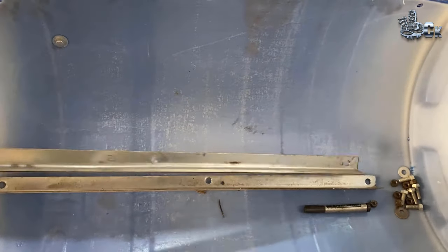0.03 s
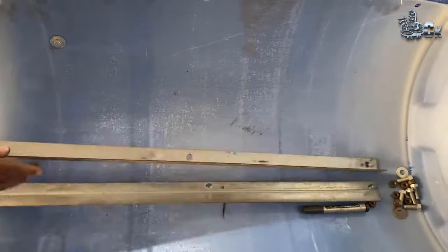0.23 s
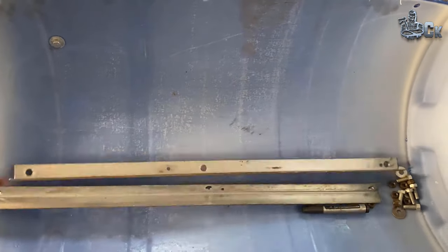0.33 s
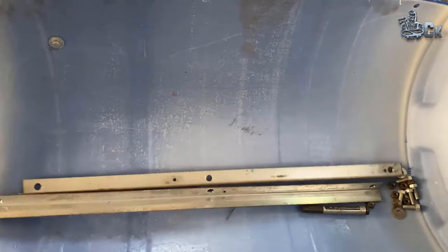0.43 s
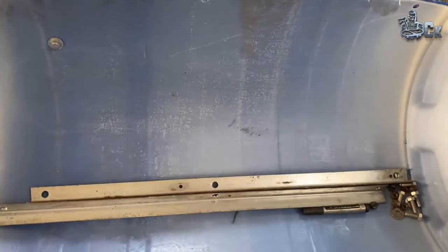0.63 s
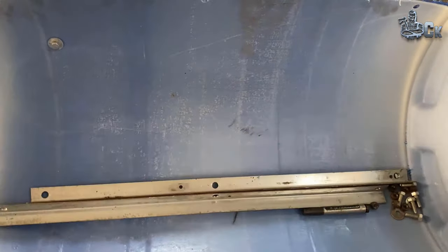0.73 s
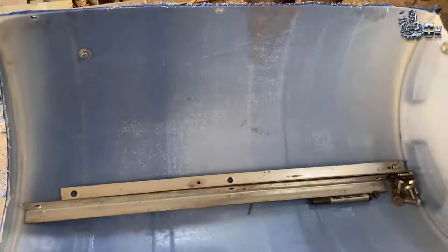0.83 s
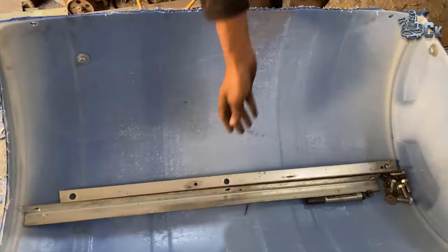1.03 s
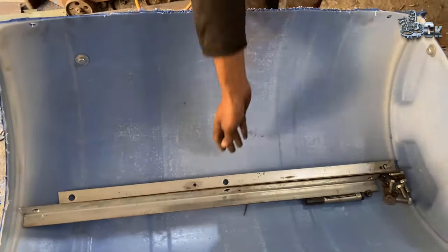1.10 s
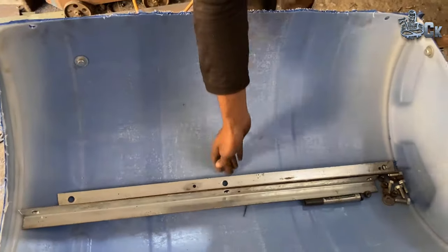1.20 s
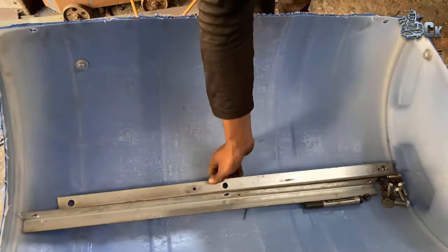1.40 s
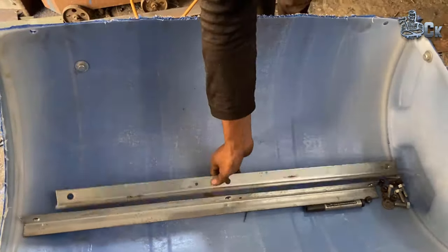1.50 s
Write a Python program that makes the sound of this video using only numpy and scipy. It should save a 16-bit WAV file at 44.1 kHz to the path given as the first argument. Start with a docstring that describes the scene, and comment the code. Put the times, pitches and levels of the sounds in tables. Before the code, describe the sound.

Steel bars clatter inside a plastic drum: a short slide, then two bursts of ringing clanks with hollow booms and jingling bolts. The clatter cuts off abruptly, and a soft bump and low scrape follow in a quiet workshop.

```python
"""Two steel bars slide, then drop and clatter inside a cut-open plastic drum in a quiet workshop.
The flat bar lands first, the angle bar next: each impact cracks, rings the steel's modes and booms
the drum wall, while loose bolts jingle at the bars' ends. The ringing is cut off abruptly.
After a soft bump of the drum, a hand starts to drag one bar, and friction shakes steel and plastic."""
import sys
import numpy as np
from scipy import signal
from scipy.io import wavfile
from scipy.ndimage import uniform_filter1d

SR = 44100
rng = np.random.default_rng(int(sys.argv[2]) if len(sys.argv) > 2 else 0)


def wav_out(sig):
    """Save sig, one row per channel (or a flat mono array), as 16-bit PCM at SR to the path in sys.argv[1]."""
    wavfile.write(sys.argv[1], SR, np.round(np.clip(np.atleast_2d(sig).T, -1, 1) * 32767).astype(np.int16))


N = 68355
TIME = np.arange(N) / SR
START_S, CUT_S = 0.0147, 0.851   # the clatter is heard between these times

# Each row: start in seconds, levels of crack, steel ring and drum boom in dB, contact cutoff in Hz.
FLAT_BAR_BLOWS = [(0.2025, -8.5, -15, -18, 13000), (0.2065, -7.5, -24.5, -10, 9400),
                  (0.236, -11.5, -24, -23.5, 3800), (0.259, -10, -27, -15.5, 1940),
                  (0.265, -4.5, -33.5, -7.5, 2000), (0.283, -4, -25, -12, 1615),
                  (0.322, -14, -21.5, -11.5, 1770)]
ANGLE_BAR_BLOWS = [(0.429, -10, -35, -17.5, 12000), (0.4325, -1.5, -18.5, -3.5, 1704),
                   (0.4405, -32, -19, -42.5, 2520), (0.469, -30.5, -23, -32, 3230),
                   (0.514, -18, -24, -14, 2780), (0.560, -13, -19.5, -12.5, 5150),
                   (0.593, -26, -20.5, -20.5, 10330), (0.609, -16.5, -21.5, -19.5, 6800),
                   (0.629, -34, -27, -35, 6000), (0.638, -13.5, -40, -18.5, 5000),
                   (0.682, -36, -35, -26.5, 4500), (0.790, -50, -49, -27.5, 3500)]
def blows(rows, bar, drum, crack):
    """Impact excitation: a softer contact lasts longer and so dulls crack, ring and boom alike."""
    cutoff_share = 0.39   # the plastic yields, which lowers its cutoff
    snap = sum(low_pass(click(s, db), hz) for s, db, _, _, hz in rows)
    strike = sum(low_pass(click(s, db), hz) for s, _, db, _, hz in rows)
    push = sum(low_pass(click(s, db), hz * cutoff_share) for s, _, _, db, hz in rows)
    return excite(snap, crack) + excite(strike, bar) + excite(push, drum)

# Each row: mode frequency in Hz, relative level in dB.
FLAT_BAR_MODES = [(2191, -5), (2612, 6.5), (3114, -0.5), (3168, 4), (3210, 2.5), (3321, 4), (3526, 2),
                  (4231, -5.5), (4708, -8.5), (5927, -4.5), (6325, -0.5), (6686, -6), (7075, -3.5),
                  (9781, -7), (10250, -6), (10835, 1.5)]
ANGLE_BAR_MODES = [(2207, -5.5), (2603, 3.5), (2907, 1), (3150, 2), (3300, -2.5), (3338, 0), (3521, -8.5),
                   (3690, 0.5), (4265, 3.5), (6325, 3.5), (7494, -1), (9964, 8)]
# Crowded modes and their echoes. Each row: frequency in Hz, relative density in dB, T60 in seconds.
STEEL_WASH = [(475, 25.5, 0.25), (900, -14, 0.19), (1508, 19.5, 0.24), (2130, -7, 0.63), (3340, 11, 0.41),
              (6000, 1, 0.57), (11700, -1.5, 0.57), (15300, -43.5, .14)]
def steel_bar(modes, t60, modes_db):
    """Free vibration: a struck bar's distinct modes ring within a wash of overlapping ones."""
    return stereo_noise(STEEL_WASH, dies=True) + from_db(modes_db) * ringing(modes, t60)

# Each row: mode frequency in Hz, relative level in dB.
HELD_BAR_MODES = [(2649, -2), (3200, -3), (3284, 1.5), (3682, 2.5), (3800, -7), (6051, 1), (9539, 7.5),
                  (11250, 10), (11480, 8)]
def held_bar(crack):
    """Damping: a bar held in the hand rings briefly and at other pitches."""
    return crack + from_db(3) * ringing(HELD_BAR_MODES, t60=0.09)

# Each row: frequency in Hz, relative density in dB, T60 in seconds.
CRACK_SPECTRUM = [(201, -8.5, 0.014), (756, 12, 0.0073), (2300, -5, 0.089), (3400, 4, 0.013),
                  (4500, 1, 0.05), (12000, -1.5, 0.081), (15600, 5.5, 0.02)]
def contact_crack():
    """Impact transient: a brief contact radiates a broad band that dies quickly."""
    return stereo_noise(CRACK_SPECTRUM, dies=True)

# Each row: mode frequency in Hz, relative level in dB.
DRUM_MODES = [(108, -13), (164, -13.5), (227, -2.5), (240, -5), (275, -1.5), (291, 0.5), (340, -10),
              (442, 4), (615, -3.5), (790, -6), (891, -3.5), (1178, -7.5)]
# Crowded modes and their echoes. Each row: frequency in Hz, relative density in dB, T60 in seconds.
DRUM_WASH = [(40, -44, 0.081), (80, -27.5, 0.95), (157, -14, 0.64), (245.4, -2, 0.93), (398, -2, 0.083),
             (536, -13.5, 0.75), (799, 2.5, 0.16), (1500, -28.5, 0.41), (4000, -37.5, 0.2)]
def drum_wall():
    """Shell resonance: the plastic wall's low modes build up quickly, then decay as a boom."""
    attack_s = 0.0023
    wash = from_db(-8.5) * stereo_noise(DRUM_WASH, dies=True)
    modes = from_db(-4.5) * ringing(DRUM_MODES, t60=0.46, spread_rad=0.25)
    return (wash + modes) * (1 - np.exp(-TIME / attack_s))

def near_node(drum, node_hz=464, depth=0.7):
    """Strike position: modes with a node near the contact are only weakly excited."""
    return drum - depth * signal.lfilter(*signal.iirpeak(node_hz, Q=2, fs=SR), drum)

def bolt(heap, lead_hz):
    """Modal ringing: a small bolt has a cluster of high modes, one strongest, heard with its heap."""
    modes = [(lead_hz, 4)] + [(hz, 0) for hz in rng.uniform(5500, 13300, size=6)]
    return from_db(-1.5) * heap + ringing(modes, t60=0.22)

# Each row: start in seconds, length in seconds, level in dB, strongest mode in Hz.
JINGLES = [(0.347, 0.043, -26, 12600), (0.428, 0.044, -23, 11100), (0.479, 0.073, -27, 12240),
           (0.561, 0.11, -25.5, 8678)]
# Each row: start in seconds, level in dB, strongest mode in Hz.
CHINKS = [(0.368, -30.5, 13100), (0.478, -33, 10800), (0.507, -27, 12240), (0.5598, -27, 8678),
          (0.572, -22, 8678), (0.591, -24.5, 11464), (0.722, -38, 9400)]
# The heap's crowded modes. Each row: frequency in Hz, relative density in dB, T60 in seconds.
BOLT_WASH = [(1500, 11.5, 0.03), (3380, 10, 0.075), (6000, 2, 0.36), (8040, -2, 0.36), (11220, -8.5, 0.75),
             (13480, -10, 0.129), (15900, -30, .08)]
def loose_bolts():
    """Rattling: bursts of small collisions make the bolts jingle; single knocks make them chink."""
    heap = stereo_noise(BOLT_WASH, dies=True)
    touches = grains(per_s=230, uneven_db=9)
    jingle = sum(excite(touches * from_db(db) * swell(s, length), steady(bolt(heap, hz)))
                 for s, length, db, hz in JINGLES)
    return jingle + sum(excite(click(s, db), bolt(heap, hz)) for s, db, hz in CHINKS)

# Each row: start and length in seconds, first and last level in dB, steel over drum in dB, cutoff in Hz.
SLIDES = [(0.0, 0.1, -34.5, -67.5, 5, 1950), (0.698, 0.15, -42.5, -58, 0.5, 3460),
          (1.477, 0.07, -75.5, -62, 28.5, 7800), (1.496, 0.053, -35, -17.5, -30, 163)]
def slides(bar, drum, after_cut):
    """Stick-slip friction: tiny slips of steel on plastic drive both the bar and the drum wall."""
    slips = grains(per_s=2500, uneven_db=4)
    on_bar = on_drum = 0
    for s, length, first_db, last_db, steel_db, hz in events(SLIDES, after_cut):
        moving = (TIME >= s) * (TIME < s + length)
        level = from_db(np.interp(TIME, [s, s + length], [first_db, last_db]))
        force = low_pass(slips * moving * level, hz)
        on_drum += force
        on_bar += force * from_db(steel_db)
    return excite(on_bar, steady(bar)) + excite(on_drum, steady(drum))

# Each row: start in seconds, length in seconds, level in dB.
RUBS = [(-0.14, 0.95, -35.5), (0.72, 0.19, -44.5)]
# Each row: frequency in Hz, relative density in dB.
RUB_SPECTRUM = [(100, -6.5), (190, -25), (300, -13), (1000, -15), (2000, -21.5), (2650, -20), (4000, -34.5),
                (9000, -33.5), (10500, -30), (13000, -59)]
def rubbing():
    """Friction noise: steel hisses as it rubs, swelling and fading with each movement."""
    return stereo_noise(RUB_SPECTRUM) * swells(RUBS)

# Each row: start in seconds, length in seconds, level in dB.
FLEXES = [(-0.1, .4, -39), (0.2, .28, -32), (0.68, .24, -45), (1.07, .3, -45)]
# Each row: frequency in Hz, relative density in dB.
FLEX_SPECTRUM = [(25, -7), (55, 0), (100, -8), (135, -5), (178, 4), (235, -16), (600, -40)]
def wall_flexing():
    """Bending of a thin wall radiates bass: a rumble for the clatter and a soft bump after it."""
    bass = stereo_noise(FLEX_SPECTRUM)
    return [bass * swells(events(FLEXES, after_cut)) for after_cut in (False, True)]

# Each row: frequency in Hz, relative density in dB.
ROOM_SPECTRUM = [(25, -6.5), (70, -12), (170, -1), (250, -12), (700, -15.5), (1800, -21.5), (2700, -25),
                 (5000, -35), (10500, -35.5), (14000, -50.5)]
def workshop():
    """Ambient noise: a faint, steady background, strongest in the bass."""
    return from_db(-55.5) * stereo_noise(ROOM_SPECTRUM)

# Each row: frequency in Hz, left-right correlation, left minus right level in dB.
STEREO_FIELD = [(60, .96, .7), (200, .96, 1.3), (400, .9, 1.1), (700, .42, 3.4), (1400, .28, 3.2),
                (2800, .5, 1.6), (6000, .2, 1.3), (12000, .33, -.2)]
def stereo_noise(spectrum, dies=False):
    """Partial coherence: noise bands mix mid and side; if it dies, each falls 60 dB in its T60."""
    edges = 22 * 2 ** np.arange(0, 9.7, 0.4)
    white = rng.standard_normal((2, 2, N + 8000))
    out = power = 0
    for k, (low, high) in enumerate(zip(edges, edges[1:])):
        hz = np.sqrt(low * high)
        if not spectrum[0][0] / 2 < hz < spectrum[-1][0] * 2:
            continue
        band = signal.butter(2, [low, high], "band", fs=SR, output="sos")
        noises = signal.sosfilt(band, white[k % 2])[:, -N:]
        decay = from_db(-60 * TIME / at_hz(spectrum, hz, 2)) if dies else np.ones(N)
        mid, side = [v * np.sqrt(np.sum(decay ** 2) / np.sum(v ** 2)) for v in noises * decay]
        alike = at_hz(STEREO_FIELD, hz)
        pair = np.sqrt((1 + alike) / 2) * mid + np.sqrt((1 - alike) / 2) * side * [[1], [-1]]
        gain = from_db(at_hz(spectrum, hz)) * np.sqrt(high - low)
        out += gain * pair * balance(hz)
        power += gain ** 2
    return out / np.sqrt(power)

def balance(hz):
    """Interaural level difference: left and right gains at one frequency."""
    return from_db(at_hz(STEREO_FIELD, hz, 2) / 2 * np.array([[1], [-1]]))

def ringing(modes, t60, spread_rad=1.2):
    """Superposition of damped sines: the first mode falls 60 dB in t60 seconds, higher ones sooner."""
    out = 0
    for hz, db in modes:
        decay = from_db(db - 60 * TIME / t60 * (hz / modes[0][0]) ** 0.45)
        ear_phase = spread_rad * rng.uniform(-1.05, 1) * np.array([[1], [-1]])
        out += decay * balance(hz) * np.sin(2 * np.pi * hz * TIME + ear_phase)
    return out / np.sqrt(sum(from_db(db) ** 2 for _, db in modes) / 2)

def excite(force, body):
    """Linear response: the force is convolved with the body's impulse response."""
    return signal.fftconvolve(force[None], body, axes=1)[:, :N]

def steady(body):
    """Energy normalisation: a steady broadband force keeps its level through the body."""
    return body / np.sqrt(np.sum(body ** 2) / 2)

def low_pass(force, hz):
    """Contact compliance: a soft contact passes little treble."""
    return signal.sosfilt(signal.butter(2, hz, fs=SR, output="sos"), force + 1e-18)

def click(s, db):
    """An impulse: one contact."""
    return from_db(db) * (np.arange(N) == int(s * SR))

def grains(per_s, uneven_db):
    """Shot noise: random contacts of uneven strength, at rms 1."""
    contacts = (rng.random(N) < per_s / SR) * rng.choice([-1, 1], N)
    force = contacts * from_db(uneven_db * np.clip(rng.standard_normal(N), -2, 2))
    return force / force.std()

def swell(s, length):
    """A half-sine envelope."""
    return np.sin(np.pi * np.clip((TIME - s) / length, 0, 1))

def swells(rows):
    """Superposed envelopes, one for each movement."""
    return sum(from_db(db) * swell(s, length) for s, length, db in rows)

def events(rows, after_cut):
    """The rows that start on one side of the cut."""
    return [row for row in rows if (row[0] >= CUT_S) == after_cut]

def at_hz(table, hz, col=1):
    """Interpolation of one column on a log-frequency axis."""
    table = np.array(table)
    return np.interp(np.log(hz), np.log(table[:, 0]), table[:, col])

def from_db(db):
    """Decibels to amplitude ratio."""
    return 10 ** (np.asarray(db) / 20)

def scene():
    """Superposition: the clatter up to its abrupt end, then quiet handling, over the workshop's noise."""
    flat = steel_bar(FLAT_BAR_MODES, t60=0.68, modes_db=-5)
    angle = steel_bar(ANGLE_BAR_MODES, t60=0.38, modes_db=-3.5)
    crack = contact_crack()
    rumble, bump = wall_flexing()
    held = held_bar(crack)
    drum = drum_wall()
    clatter = blows(FLAT_BAR_BLOWS, flat, near_node(drum), crack)
    clatter += blows(ANGLE_BAR_BLOWS, angle, drum, crack)
    clatter += loose_bolts() + rubbing() + slides(angle, drum, after_cut=False) + rumble
    handling = bump + slides(held, drum, after_cut=True)
    gate = uniform_filter1d(1.0 * (TIME > START_S) * (TIME < CUT_S), size=64)
    return clatter * gate + handling + workshop()

def record(dry):
    """Band limiting and saturation: the deepest bass falls away, peaks are rounded, the top is cut."""
    low_hz, high_hz, ceiling = 30, 16800, 0.41
    thinned = signal.sosfilt(signal.butter(2, low_hz, "high", fs=SR, output="sos"), dry)
    rounded = ceiling * np.tanh(thinned / ceiling)
    return signal.sosfilt(signal.cheby2(12, 70, high_hz, fs=SR, output="sos"), rounded)

dry = scene()
out = record(dry)
wav_out(out)
```